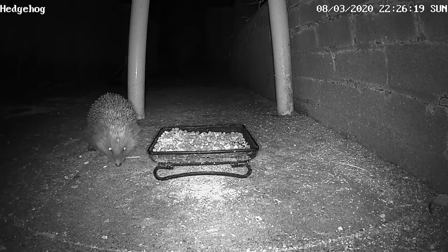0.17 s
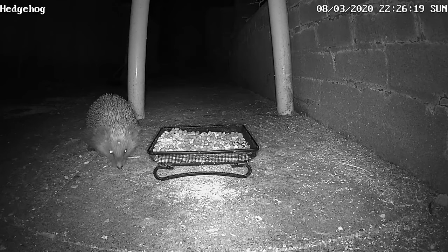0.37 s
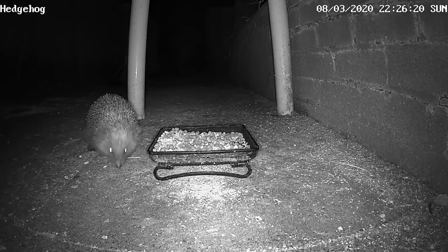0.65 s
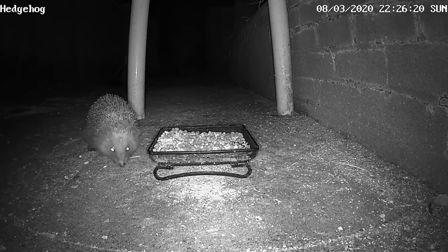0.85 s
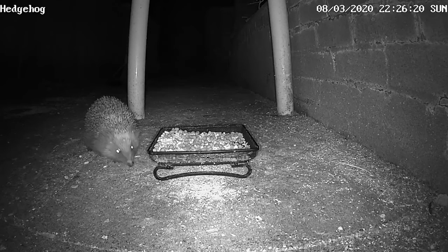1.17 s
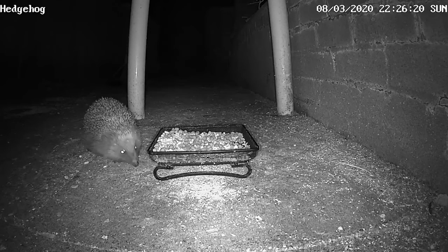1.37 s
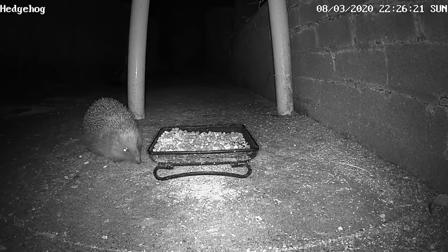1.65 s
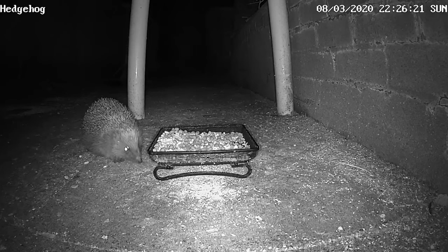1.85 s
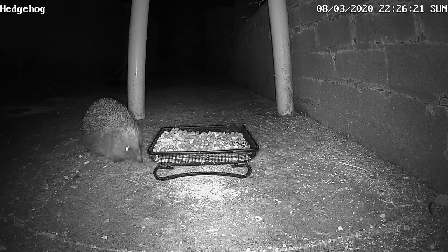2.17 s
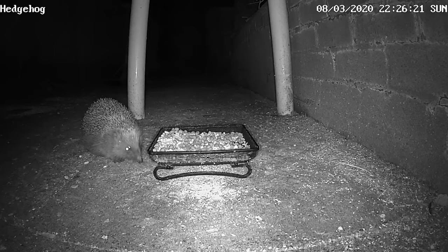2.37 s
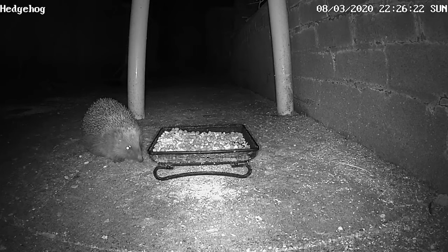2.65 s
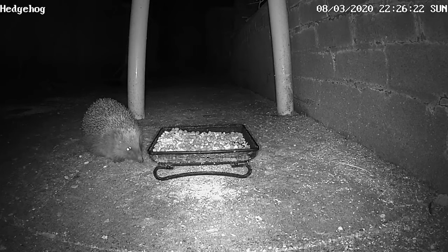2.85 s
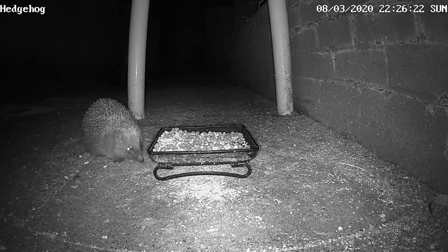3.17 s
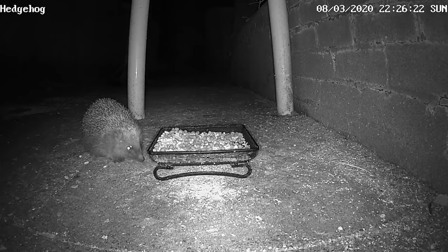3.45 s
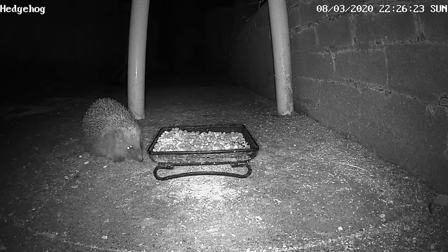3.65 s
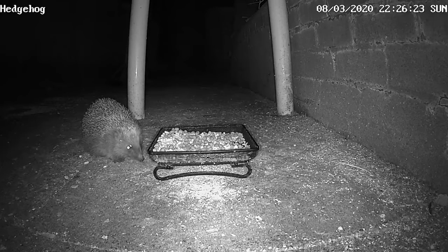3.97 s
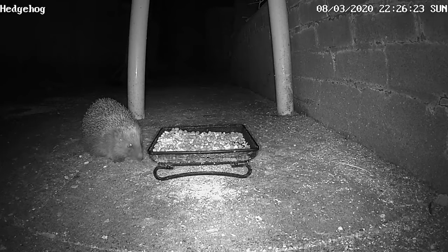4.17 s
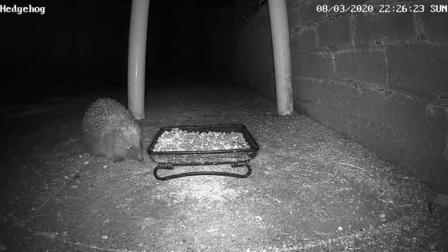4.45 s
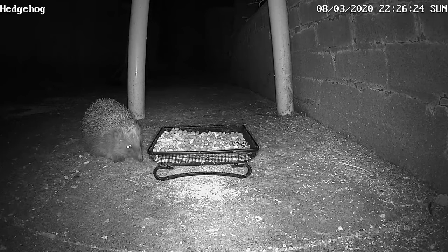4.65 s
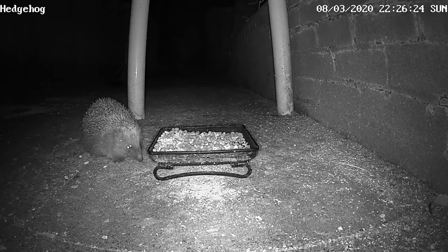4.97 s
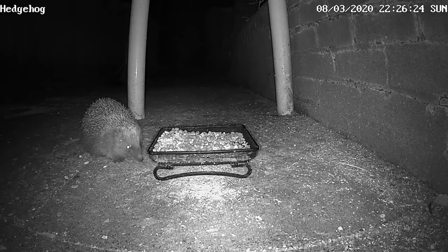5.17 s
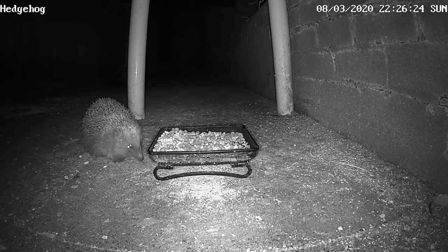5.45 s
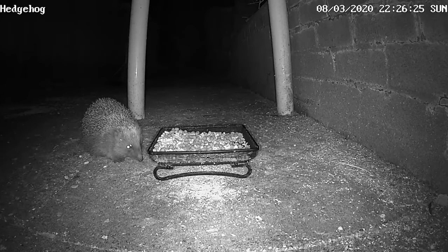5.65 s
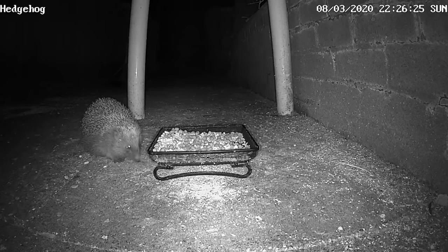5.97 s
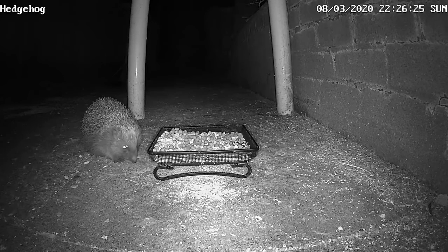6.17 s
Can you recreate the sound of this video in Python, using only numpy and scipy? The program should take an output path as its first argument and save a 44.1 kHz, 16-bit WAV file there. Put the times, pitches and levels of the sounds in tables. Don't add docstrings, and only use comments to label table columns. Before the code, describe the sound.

A hedgehog crunches dry pellets in the quiet night, crisp irregular snaps and tiny crumb ticks over a faint distant traffic rumble.

```python
import sys
import numpy as np
from scipy import signal
from scipy.fft import rfft, irfft
from scipy.io import wavfile
from scipy.ndimage import uniform_filter1d, minimum_filter1d

SR = 44100
rng = np.random.default_rng(int(sys.argv[2]) if len(sys.argv) > 2 else 0)


def log_audio(samples):
    frames = np.atleast_2d(samples).T
    limited = np.clip(frames, -1, 1)
    pcm = np.round(limited * 32767).astype(np.int16)
    wavfile.write(sys.argv[1], SR, pcm)


def attenuation_scalar(level_db):
    decades = np.asarray(level_db, float) / 20
    return 10 ** decades


N = 277922

# f/Hz, density/dB per Hz
TRAFFIC_SPECTRUM = [(7.1, -31), (12, -0.5), (93, -2), (146, -9), (179, -12), (432, -18.5), (503, -18.5),
                    (854, -24.5), (969, -23), (1050, -24.5), (1220, -26.5), (3170, -41.5), (5000, -42.5),
                    (6500, -65), (11000, -120)]
# t/s, level/dB
TRAFFIC_LEVEL = [(0.0, -59.5), (0.97, -59.5), (1.84, -61), (2.28, -60.5), (3.1, -61.5), (3.84, -61),
                 (4.11, -60), (5.23, -61.5), (6.3, -61)]
# t/s, level/dB
RUMBLE_LEVEL = [(0.0, -49), (0.39, -55.5), (2.6, -52), (2.91, -60), (3.0, -50.5), (3.6, -63), (3.86, -53),
                (4.81, -55), (5.0, -49.5), (5.37, -50.5), (5.77, -57.5), (6.3, -53.5)]
# f/Hz, width/Hz, level/dB
FAN_HUM = [(513.6, 33, -71.5), (933, 30, -76.5), (1133, 8.9, -82)]
# delay/ms, level/dB
REFLECTIONS = [
    (1.385, -2.5),
    (2.55, -9.5),
    (3.4, -13),
    (3.95, -13),
]
# teeth meet t/s, grinding level/dB, closing/s per 20 dB, opening/s per 20 dB
JAW_STROKES = [(0.3, -79, .15, .15), (0.51, -70, 0.14, 0.08), (0.76, -78, 0.14, .2),
               (0.89, -69, 0.14, 0.13), (1.08, -66, 0.18, .08), (1.34, -68, 0.076, .15),
               (1.55, -72, .15, .15), (1.73, -72, 0.12, .2), (1.89, -63, .08, 0.11),
               (2.08, -67.5, .15, 0.18), (2.25, -63, .18, 0.095), (2.43, -62, 0.16, 0.2),
               (2.7, -65.5, 0.25, 0.3), (2.97, -57, 0.082, 0.15), (3.21, -69, 0.4, 0.9),
               (3.52, -68.5, 0.11, 0.19), (3.78, -68, 0.21, 0.15), (4.141, -61, 0.11, 0.087),
               (4.37, -66.5, 0.14, 0.1), (4.66, -71, 0.18, 0.1), (4.88, -70.5, 0.078, 0.27),
               (5.13, -67.5, .2, 0.07), (5.42, -73, 0.19, 0.27), (5.64, -68.5, 0.099, 0.46),
               (5.92, -74, 0.58, 0.44), (6.09, -70.5, 0.26, .07), (6.29, -76, 0.12, .1)]
# f/Hz, level/dB
MOUTH_COLOUR = [(700, -25), (1500, -12), (2700, -2), (3300, -3.5), (3750, -9.5), (4050, -6), (4400, 2),
                (5300, -4.5), (6500, -3.5), (7600, -15.5)]
# t/s, peak level/dB, fragment ring f/Hz, jaw thud level/dB,
# broad snap level/dB re ring
PELLET_CRACKS = [(0.8515, -45.5, 4700, -25, -12), (0.8691, -44, 4170, -8, 1), (1.0733, -43, 3970, -2.5, 2),
                 (1.1007, -42.5, 3550, -4, 0), (1.2778, -28.5, 5900, -13.5, 1.5),
                 (1.4777, -45, 4300, -24, -5), (1.5153, -37, 4800, -26, 1),
                 (1.5699, -30.5, 3850, -9.5, 3.5), (1.6352, -31, 5030, -18, 3), (1.8312, -42, 4430, -25, 2),
                 (1.8676, -40.5, 5030, -18, -3.5), (2.106, -42.5, 4300, -8, -3),
                 (2.1379, -29.5, 6300, -27, -4.5), (2.2252, -41.5, 4140, -4, -5.5),
                 (2.3929, -43.5, 4650, -8, -8), (2.6355, -45.5, 4560, -8, -5), (2.6592, -29, 4850, -11, 1),
                 (2.7316, -35, 4620, -25, -4), (2.943, -28, 4680, -12, 0.5), (3.0171, -42, 4300, -19, 8),
                 (3.3049, -44, 4300, -11.5, 8), (3.7665, -41.5, 4230, -18, 6),
                 (4.381, -42.5, 5980, -0.5, -4), (4.8806, -44.5, 3460, -13, -4),
                 (0.8807, -46, 4170, -10, 2), (1.0553, -46, 4450, -15, -5), (1.2916, -31, 5330, -17, -3.5),
               (1.33, -42.5, 5810, -9, -7.5), (1.3384, -51, 4400, -12, -5), (1.4882, -46.5, 4300, -9, 16),
               (1.5777, -52, 3220, 8.5, 1), (1.6434, -57, 3470, -4, -1), (1.9064, -46, 4800, -21, -7),
               (2.0686, -49, 4340, -11, 1.5), (2.1464, -41.5, 5800, -4, 1), (2.152, -44, 4000, -10, -8),
               (2.1887, -46, 3600, -7.5, 9), (2.1964, -41, 4370, -2.5, -1), (2.384, -47, 4800, -11, -3),
               (2.6532, -38.5, 5350, -1.5, -1), (2.779, -46, 4300, -9, -1.5), (2.9617, -39, 4200, -13, 12),
               (2.9715, -44.5, 4700, 4, -6), (2.993, -45.5, 4390, -5, 1), (3.2033, -51, 4540, -11, -11),
               (3.2597, -45.5, 4500, -1, -5), (4.136, -46, 4430, -8, -2), (4.1444, -53, 3780, -17, -7)]
# t/s, peak level/dB, ring f/Hz
CRUMB_TICKS = [(1.0268, -51.5, 4430), (1.0449, -56, 4000), (1.1166, -57, 3600), (1.7372, -56, 3740),
               (1.7729, -59, 4530), (1.8156, -53, 4500), (1.8547, -50, 4070), (2.04, -56, 4600),
               (2.0505, -54, 4300), (2.25, -56, 3480), (2.295, -54, 3700), (2.449, -55, 4600),
               (2.4721, -58, 3900), (2.481, -56, 3600), (2.825, -57.5, 3800), (2.8446, -58, 4100),
               (3.1828, -56.5, 4440), (3.213, -60, 4440), (3.506, -57, 4150), (3.542, -72, 4300),
               (3.7283, -56, 4300), (3.7575, -54, 5100), (3.8227, -54.5, 4040), (4.1184, -56.5, 3900),
               (4.1292, -50, 4100), (4.3615, -58.5, 3730), (4.6519, -57.5, 4070), (4.8525, -54, 3620),
               (5.1376, -58, 3600), (5.6274, -57, 4400)]
# f/Hz, level/dB
CHEWING_COLOUR = [(600, 0.5), (1100, 1), (1450, 1.5), (2200, 1.5), (2700, -1.5), (3400, 1.5), (4000, -1),
                  (4700, -1.5), (5500, -1.5), (6500, 0), (7100, -6.5), (8000, 1.5)]
# f/Hz, level/dB
HISS_COLOUR = [(2500, -20), (5000, -4.5), (6500, -1), (7500, 4.5), (9000, -5)]
# f/Hz, level/dB
HOUSING_COLOUR = [(900, 0.5), (6300, -2.5), (7000, -3), (7600, -15), (8100, -36), (9000, -70)]
# level near 3.5 kHz/dB, top f/Hz
FAINT_TOP = [(-101, 7000), (-99, 8000)]
# t/s, top f/Hz
OPENING_TOP = [(0, 5050), (.3, 5350), (.45, 5400), (.7, 6000), (.73, 7000), (.81, 8000)]
# start t/s, length/s, top f/Hz
NARROW_TOP = [(0.95, .04, 6500), (1.15, .11, 5600), (1.97, .04, 6500), (2.55, .04, 5600), (3.9, .08, 5300),
              (3.98, .09, 6100), (4.22, .11, 5400), (4.45, .11, 5600), (4.56, .05, 6500), (4.72, .12, 5000),
              (4.98, .1, 6100), (5.17, .04, 5200), (5.23, .1, 6300), (5.55, .04, 5200), (6.0, .04, 6500),
              (6.14, .09, 5200)]


def unit(x):
    return x / np.sqrt(np.mean(x ** 2))


def curve(table):
    return np.interp(np.arange(N) / SR, *np.transpose(table))


def colour(x, points):
    hz, db = np.transpose(points)
    f = np.maximum(np.fft.rfftfreq(len(x), 1 / SR), 1)
    gain = attenuation_scalar(np.interp(np.log(f), np.log(hz), db))
    return irfft(rfft(x) * gain, len(x))


def ring(x, hz, width_hz):
    return signal.lfilter(*signal.iirpeak(min(hz, .4 * SR), hz / width_hz, fs=SR), x)


def walk(rate_hz):
    hold = int(SR / rate_hz)
    steps = np.repeat(rng.standard_normal(N // hold + 1), hold)
    return 1.13 * uniform_filter1d(uniform_filter1d(steps, hold), hold)[:N]


def night():
    spectrum = rfft(colour(rng.standard_normal(N), TRAFFIC_SPECTRUM))
    f = np.fft.rfftfreq(N, 1 / SR)

    def part(low_hz, high_hz):
        return irfft(spectrum * ((f >= low_hz) & (f < high_hz)), N)

    edges_hz = [70, 110, 180, 360, 720, 1440, SR]
    traffic = sum(part(low, high) * attenuation_scalar(1.2 * walk(2.5)) for low, high in zip(edges_hz, edges_hz[1:]))
    traffic = traffic / np.std(part(144.4, 900)) * attenuation_scalar(curve(TRAFFIC_LEVEL))
    rumble = unit(part(0, edges_hz[0])) * attenuation_scalar(curve(RUMBLE_LEVEL) + 1.0)
    hum = sum(attenuation_scalar(db) * unit(ring(rng.standard_normal(N), hz, width_hz)) for hz, width_hz, db in FAN_HUM)
    return traffic + rumble + hum


def path():
    scatter_db, scatter_t60_s = -20, 0.061
    yard_db, yard_t60_s = -34, 0.21
    rise_s = 0.00057
    t = np.arange(SR // 4) / SR
    dull = signal.butter(2, 5500, fs=SR)
    gravel, yard = signal.lfilter(*dull, rng.standard_normal((2, len(t))))
    gravel = attenuation_scalar(scatter_db) * gravel * np.exp(-np.log(1000) * t / scatter_t60_s)
    yard = attenuation_scalar(yard_db) * yard * np.exp(-np.log(1000) * t / yard_t60_s)
    response = np.minimum(t / rise_s, 1) * (gravel + yard)
    response[0] = 1
    for ms, db in REFLECTIONS:
        response[int(ms * SR / 1000)] += attenuation_scalar(db)
    return response


def effort():
    t = np.arange(N) / SR
    strokes = []
    for s, db, closing_s, opening_s in JAW_STROKES:
        away = np.where(t < s, (s - t) / closing_s, (t - s) / opening_s)
        strokes.append(db - 20 * away)
    return np.max(strokes, axis=0)


def grinding():
    crumbs_per_s = 900
    size_db = np.minimum(3.5 * rng.exponential(size=N), 13)
    crumbs = (rng.random(N) < crumbs_per_s / SR) * attenuation_scalar(size_db) * rng.standard_normal(N)
    cavity = ring(ring(crumbs, 3750, 450), 3750, 450)
    mouth = unit(colour(crumbs, MOUTH_COLOUR)) + attenuation_scalar(-11) * unit(cavity)
    press_db = effort()
    uneven_db = np.clip(0.22 * (press_db + 86), 1.5, 4.0)
    return mouth * attenuation_scalar(press_db - 7 + uneven_db * walk(40))


def cracks():
    tick_jaw_db, tick_broad_db = -15, -2.5
    creak_s, splinter_s = 0.0053, 0.0046
    lead, size = 600, 2048
    table = PELLET_CRACKS + [(*tick, tick_jaw_db, tick_broad_db) for tick in CRUMB_TICKS]
    out = np.zeros(N + size)
    t = (np.arange(size) - lead) / SR
    chance = rng.standard_normal((len(table), size))
    for (s, db, hz, jaw_db, broad_db), c in zip(table, chance):
        creak = attenuation_scalar(-38.5) * np.exp(np.minimum(t, 0) / creak_s) * (t < 0)
        splinter_db = -33.0 - 0.05 * (db + 39.5)
        splinters = attenuation_scalar(splinter_db) * np.exp(-np.maximum(t, 0) / splinter_s) * (t > 0)
        snap = c ** 3 / 4 * (creak + splinters)
        snap[lead] = np.sign(c[0])
        fragment = ring(ring(snap, hz, .5 * hz), hz, .5 * hz)
        broad = ring(ring(snap, 3100, 5200), 3200, 11000)
        shell = fragment + attenuation_scalar(broad_db - 2.0) * broad
        jaw = ring(ring(snap, 1650, 2100), 1600, 2200)
        crack = shell / np.abs(shell).max() + attenuation_scalar(jaw_db - 8.5) * jaw / np.abs(jaw).max()
        i = int(s * SR) - lead
        out[i:i + size] += attenuation_scalar(db + 6.5) * crack
    return out[:N]


def scene():
    chewing = colour(cracks() + attenuation_scalar(2) * grinding(), CHEWING_COLOUR)
    return (signal.fftconvolve(chewing, path())[:N] + night())[None]


def band_power(z, band):
    return np.array([np.mean(np.abs(z[band == b]) ** 2, axis=0) for b in range(band.max() + 1)])


def thin_bands(x, loud_db=-66, below_db=-32, scatter_db=4.0, lowest_hz=1900):
    f, t, z = signal.stft(x, SR, "cosine", 704, 352)
    band = (np.sqrt(f) / 4.5).astype(int)
    power = band_power(z, band)
    treble = power[band[f > lowest_hz][0]:].max(axis=0)
    crack = -minimum_filter1d(-treble, size=9, origin=2)
    limit = crack * attenuation_scalar(below_db + scatter_db * rng.standard_normal(power.shape)) ** 2
    dropped = (power < limit) & (crack > attenuation_scalar(loud_db) ** 2)
    holes = dropped[band] & (f > lowest_hz)[:, None]
    return signal.istft(z * ~holes, SR, "cosine", 704, 352)[1][:N]


def narrow_treble(x, quiet_db=-95, lowest_hz=2400, top_step_hz=470):
    f, t, z = signal.stft(x, SR, "cosine", 2048, 1024)
    band = (np.sqrt(f) / 2.2).astype(int)
    power = band_power(z, band)
    unlucky = rng.random((len(power), len(t) // 3 + 1)) < .17
    unlucky = np.repeat(unlucky, 3, axis=1)[:, :len(t)]
    holes = (unlucky & (power < attenuation_scalar(quiet_db) ** 2))[band] & (f > lowest_hz)[:, None]
    treble = np.abs(z[(f > 2500) & (f < 4400)]) ** 2
    treble_db = 10 * np.log10(np.mean(treble, axis=0) + 1e-18)
    treble_db = uniform_filter1d(np.minimum(treble_db, -95), size=3)
    top_hz = np.interp(treble_db, *np.transpose(FAINT_TOP))
    top_hz = np.minimum(top_hz, np.interp(t, *np.transpose(OPENING_TOP)))
    late = t + .012
    for since, length, hz in NARROW_TOP:
        top_hz[(late >= since) & (late < since + length)] = hz
    inside = f[:, None] < np.round(top_hz / top_step_hz) * top_step_hz
    return signal.istft(z * (inside & ~holes), SR, "cosine", 2048, 1024)[1][:N]


def top_cut(x):
    return signal.sosfilt(signal.butter(12, 8100, fs=SR, output="sos"), x)


def record(dry):
    hiss_db, dc_offset, last_bit_db = -83, .0009, -101
    hiss = attenuation_scalar(hiss_db) * unit(colour(rng.standard_normal(N), HISS_COLOUR))
    housed = colour(dry[0] + hiss, HOUSING_COLOUR)
    x = narrow_treble(thin_bands(housed))[None] + dc_offset
    mix = x + attenuation_scalar(last_bit_db) * rng.standard_normal(x.shape)
    return top_cut(mix)


dry = scene()
out = record(dry)
log_audio(out)
```